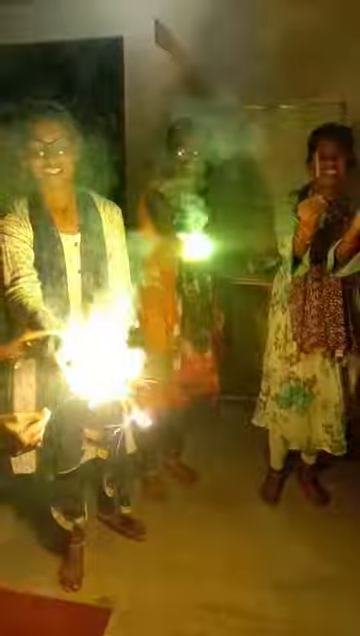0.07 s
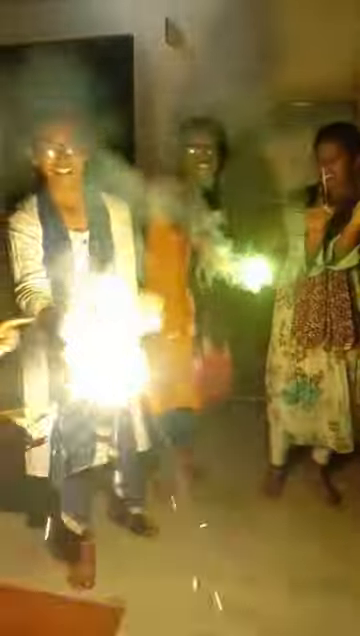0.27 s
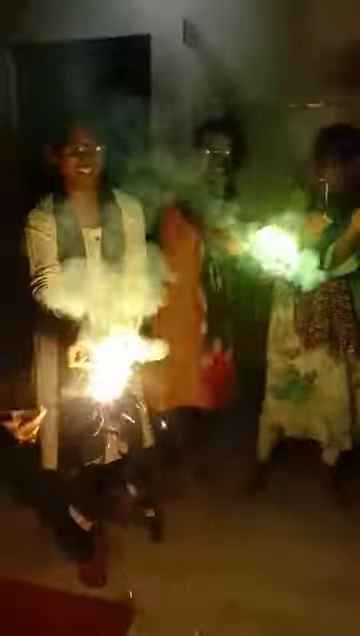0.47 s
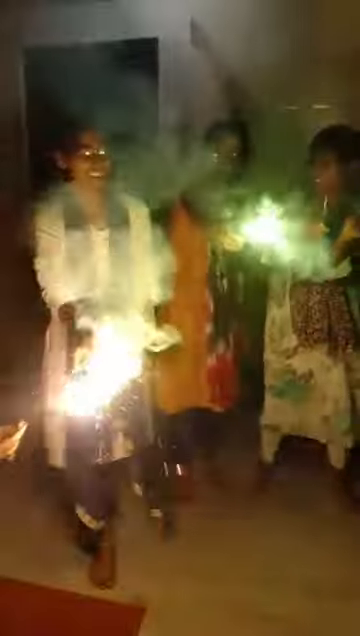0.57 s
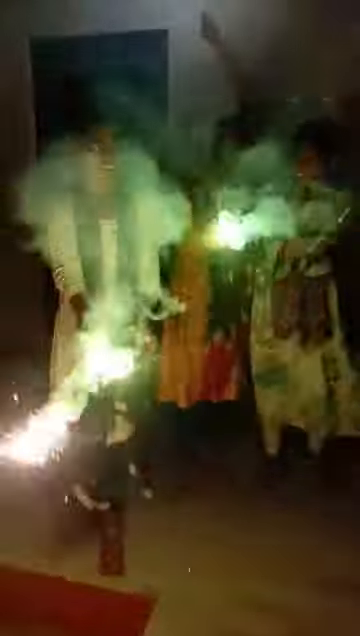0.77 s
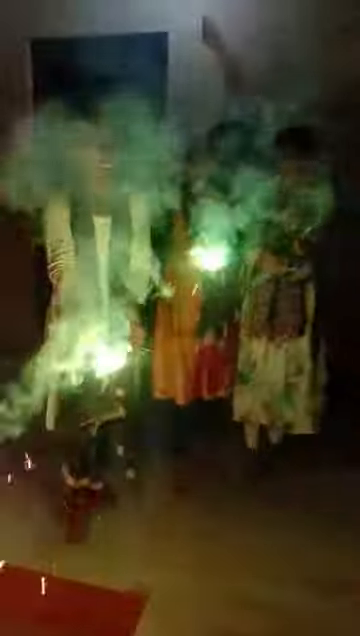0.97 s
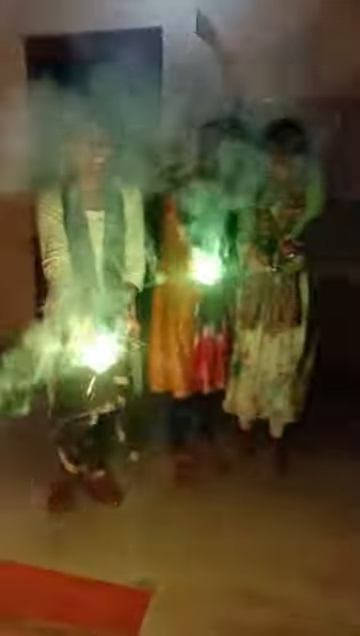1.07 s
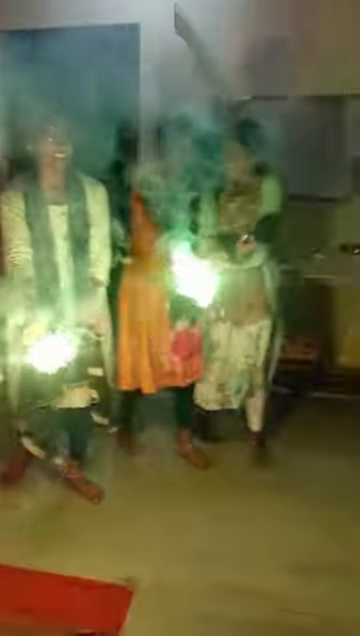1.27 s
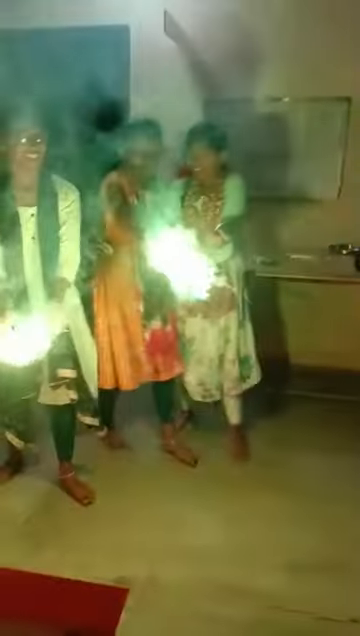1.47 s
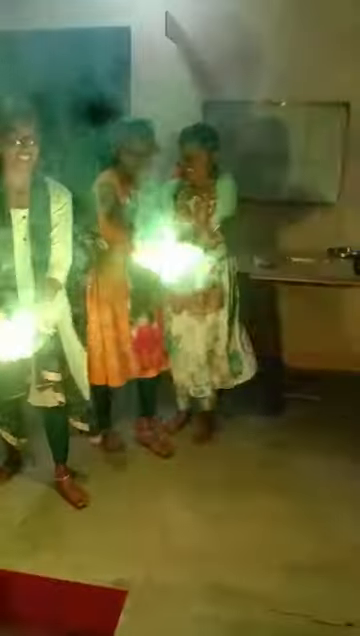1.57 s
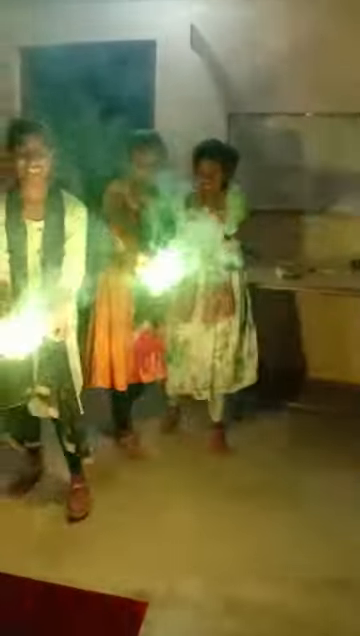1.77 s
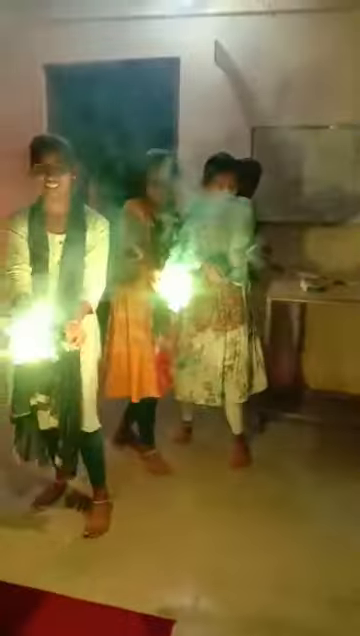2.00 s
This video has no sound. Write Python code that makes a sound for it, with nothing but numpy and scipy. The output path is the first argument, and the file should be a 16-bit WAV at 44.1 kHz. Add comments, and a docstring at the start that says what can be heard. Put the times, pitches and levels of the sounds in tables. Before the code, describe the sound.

Handheld sparklers fizz and crackle close up in a bare, hard room. After silence until 0.12 seconds, hiss fades in with small spits and a faint pip near 0.24. Sharp, echoing pops crowd together from 0.4 to 1.1, strongest near 1.1, then thin out. At 1.53 a firecracker bangs, thumps and decays into low roar, with sparse snaps, treble sizzle and bass swells until about 2.04.

```python
"""Handheld sparklers fizz and spit in a bare, hard room, close to a small microphone; the sound fades in.
The fizz is patchy noise full of small random sparks; loud pops are filtered pulses with their own echoes.
Distinct echoes come back from floor and walls within 25 ms, over a diffuse tail.
A firecracker bangs as a shock, noise blast and thump, then rolls on as a low roar; a faint pip sounds early.
Treble sizzle and late bass swells lie underneath; a look-ahead limiter and a hard ceiling hold the peaks."""
import sys
import numpy as np
from scipy import signal
from scipy.io import wavfile
from scipy.ndimage import uniform_filter1d, minimum_filter1d

SR = 44100
rng = np.random.default_rng(int(sys.argv[2]) if len(sys.argv) > 2 else 0)


def pcm_store(signal):
    """Save signal as 16-bit PCM."""
    levels = np.round(np.clip(np.atleast_2d(signal), -1, 1) * 32767)
    wavfile.write(sys.argv[1], SR, levels.astype(np.int16).T)


N = 89875  # samples


def amp(db):
    """Gain from dB."""
    return 10 ** (np.asarray(db) / 20)


def evened(x):
    """Scales to rms 1."""
    return x / np.sqrt(np.mean(x ** 2) + 1e-20)


def curve(points):
    """A time table read at every sample, in straight lines between its points."""
    return np.interp(np.arange(N) / SR, *np.transpose(points))


def read(points, hz):
    """A spectrum table read on a log-frequency axis."""
    f, value = np.transpose(points)
    return np.interp(np.log(hz + 1), np.log(f + 1), value)


def add(mix, s, sound):
    """Mixes a sound in at a time in seconds, cut off where the mix ends."""
    part = mix[round(s * SR):][:len(sound)]
    part += sound[:len(part)]


# Microphone colour, applied to every noise and click. Each row: frequency in Hz, gain in dB.
MIC_COLOUR = [(30, -24), (70, -4), (130, -4.5), (1000, -7.5), (2500, -4.5), (3500, -1), (4500, 1.5),
              (5800, -0.5), (6400, -9), (6900, -12.5), (7500, -13.5), (8400, -21), (11800, -15.5),
              (13600, -23), (14400, -24), (15200, -27.5), (15700, -50.5)]


def noise(tone, patchy_db, flicker_db):
    """Coloured noise, rms 1, with drifting patches in time and frequency and wide-band flicker."""
    frames, hz = N // 128 + 5, np.fft.rfftfreq(512, 1 / SR)
    real, imag, patches = rng.standard_normal((frames, 257, 3)).T
    patches = uniform_filter1d(patches, size=8, axis=0)  # across neighbouring frequencies
    patches = evened(uniform_filter1d(patches, size=14, axis=1))  # across time frames
    flicker = evened(uniform_filter1d(rng.standard_normal(frames), size=3))
    colour_db = (read(tone, hz) + read(MIC_COLOUR, hz))[:, None]
    gain = amp(colour_db + patchy_db * patches + flicker_db * flicker)
    spectrum = (real + 1j * imag) * gain
    return evened(signal.istft(spectrum, nperseg=512, noverlap=384)[1][:N])


def click(tone, tilt_db=0.):
    """The causal (minimum-phase) pulse of a spectrum through the microphone, peak 1."""
    hz = abs(np.fft.fftfreq(4096, 1 / SR))
    tilt = tilt_db * np.log2((hz + 200) / 4000)  # dB per octave, pivoting near 4 kHz
    log_gain = np.log(amp(read(tone, hz) + read(MIC_COLOUR, hz) + tilt))
    pulse = np.fft.ifft(np.exp(np.conj(signal.hilbert(log_gain)))).real[:1024]
    return pulse / abs(pulse).max()


def sparks(per_s, spread_db):
    """Single-sample impulses at random times with random sign, a few of them large."""
    size = amp(spread_db * np.minimum(rng.exponential(1, N), 4))
    struck = rng.random(N) < per_s / SR
    return size * struck * rng.choice([-1, 1], N)


# Hiss of the burning coat. Each row: time in seconds, level in dB.
FIZZ_LEVEL = [(.12, -55), (.135, -41), (.18, -38.5), (.26, -30.5), (.35, -23), (.48, -27.5), (.62, -26.5),
              (.76, -22), (.9, -23.5), (1.04, -22), (1.2, -23), (1.35, -21), (1.5, -22), (1.62, -23),
              (1.72, -27.5), (1.85, -28), (1.97, -24), (2.04, -42)]
# Colour of the hiss. Each row: frequency in Hz, level in dB per Hz.
FIZZ_TONE = [(50, -21), (200, -12), (500, -7.5), (1200, 0.5), (2500, -1.5), (5000, 2), (9000, -8.5),
             (16000, -16.5)]
# Rate of the small sparks. Each row: time in seconds, sparks a second of each brightness.
SPIT_RATE = [(.15, 70), (.6, 71), (1.15, 35), (1.3, 20), (2.0, 12)]
# Colour of a small spark before its tilt. Each row: frequency in Hz, level in dB per Hz.
SPIT_TONE = [(50, -36), (200, -9), (600, -15.5), (1500, 6), (4000, -7), (9000, 18), (16000, -26)]
# Brightness of the small sparks. Each entry: spectral tilt in dB per octave.
SPIT_TILTS = (1.1, 4.5, 5.6)
SPIT_DB, SPIT_SPREAD_DB, SPIT_ECHO_DB = -13, 3, -3  # the first is relative to the hiss


def fizz():
    """The burning coat: patchy hiss with many small sparks of three brightnesses bursting in it."""
    spits = np.zeros(N)
    for tilt in SPIT_TILTS:
        hits = sparks(curve(SPIT_RATE), SPIT_SPREAD_DB)
        spits += signal.oaconvolve(hits, click(SPIT_TONE, tilt))[:N]
    echoes = signal.oaconvolve(spits, room(1))[:N]
    spits = spits + amp(SPIT_ECHO_DB) * echoes
    hiss = noise(FIZZ_TONE, patchy_db=1.2, flicker_db=.8)
    return amp(curve(FIZZ_LEVEL)) * (hiss + amp(SPIT_DB) * spits)


# Loud sparks. Each row: start in seconds (POP_LAG_S is added), snap level in dB, gain on the echoes in dB,
# levels of thump, body and treble in dB (each raised by its crest), stretch of the echo delays as a ratio.
POPS = [(0.174, -17.5, -1, -68, -35.5, -53, 0.98), (0.1974, -11, -17, -67, -40, -32, 0.96),
        (0.2226, -15, -16, -56, -46, -41, 0.99), (0.2733, -5, -0.5, -32, -18, -30.5, 0.98),
        (0.3186, -11, -6.5, -59, -27, -42, 1), (0.3542, -10, -6, -53, -29, -42, 0.99),
        (0.3856, -2, -16, -45, -33, -35, 0.99), (0.408, 1.5, -16, -43, -37, -31, 0.99),
        (0.4213, -1.5, -11, -38, -26, -27, 1), (0.4359, -0.5, -4, -40, -18.5, -32, 0.98),
        (0.4693, -7, -7, -50, -39, -32, 0.99), (0.4813, -3.5, -14, -48, -35, -37, 0.94),
        (0.4953, -5, -6, -37.5, -24, -40, 0.97), (0.5124, 0.5, -4, -51, -18, -27, 0.98),
        (0.5345, -5, -1.5, -45, -28, -23, 1), (0.5574, -6, -8, -50, -31, -29, 0.97),
        (0.585, -6, -5.5, -51, -29.5, -30, 0.99), (0.6009, -9.5, -5, -57, -34, -31, 0.99),
        (0.6255, -4.5, -8, -51, -43, -39, 0.99), (0.635, -3, -7.5, -44, -24, -27, 0.98),
        (0.6607, 1, -3, -42, -15, -25, 1), (0.6617, -2, -4.5, -31, -26, -25, 0.98),
        (0.7062, -1, -19, -40, -34, -38, 0.88), (0.728, 2.5, -5.5, -38, -16.5, -36, 1),
        (0.7725, -5, -12, -43, -25, -32, 0.99), (0.7903, -1, 1, -28, -17.5, -28, 1),
        (0.834, 3, -4, -56, -15, -39, 0.98), (0.8635, 0, -12, -46, -43, -40, 0.99),
        (0.914, -1, -1.5, -42, -20.5, -31, 0.98), (0.9446, 1, -6, -37, -20.5, -33, 0.95),
        (0.9839, 1, -1.5, -35, -18.5, -39, 1), (1.0303, -5, -13, -58, -35, -40, 0.99),
        (1.0568, -13, -10, -49, -32, -42, 0.99), (1.075, 10, -12.5, -64, -12, -34, 0.99),
        (1.1201, 10.5, -17, -53, -22, -35, 0.96), (1.1348, -4, -2.5, -39, -23, -30, 1),
        (1.1541, -2.5, -7, -51, -27, -31, 0.91), (1.1654, -14, -11, -57, -40, -28, 0.99),
        (1.255, 0.5, -3, -37, -14.5, -36, 0.98), (1.3367, -22, -8, -52, -22, -28, 1),
        (1.384, -10, -10, -59, -39, -31, 0.99), (1.4166, -25.5, 1, -60, -27.5, -43, 0.96),
        (1.488, -29, -17, -44, -29.5, -24, 0.99), (1.5124, -22, -13, -48, -33, -33, 0.99),
        (1.5192, -4, -21, -43, -21, -22, 0.99), (1.6087, -2, -6, -36, -8, -41, 0.99),
        (1.6768, -11, -16, -37, -20.5, -27, 0.96), (1.6823, -5, -24, -36, -26, -34, 0.99),
        (1.9101, -15, -8, -37, -28.5, -36, 0.99), (1.9912, -13, -5, -38, -31, -34, 0.95),
        (2.0213, -11, -3, -35, -29.5, -27, 1)]
# Colour of the snap. Each row: frequency in Hz, level in dB per Hz.
SNAP_TONE = [(500, -25.5), (2000, 0), (3000, -1), (6500, 0.5), (9000, -5), (16000, -50)]
# Colour of the body. Each row: frequency in Hz, level in dB per Hz.
BODY_TONE = [(80, -22.5), (250, -1.5), (1000, 0.5), (2200, 6.5), (4000, -33), (9000, -59.5)]
# Colour of the treble, in the pops and in the sizzle. Each row: frequency in Hz, level in dB per Hz.
SIZZLE_TONE = [(5000, -35), (8000, -10), (10000, -9), (13000, -13), (16000, 17.5)]
# What the walls take from the pops. Entries: gain in dB for snap, thump, body and treble.
ECHO_LOSS_DB = (0, -12, -5, -1)
POP_LAG_S = 0.00045
THUMP_HZ, THUMP_T60 = 125, .028  # T60: seconds to fall 60 dB
THUMP_CREST_DB, BODY_CREST_DB, TREBLE_CREST_DB = 12, 10.5, 11  # peak of each part over its table level


def pops():
    """Loud sparks: a snap pulse with body, treble and a decaying low thump, then its echoes."""
    out, t = np.zeros(N), np.arange(1024) / SR
    thump = amp(-60 * t / THUMP_T60) * np.sin(2 * np.pi * THUMP_HZ * t)
    parts = np.array([click(SNAP_TONE), thump, click(BODY_TONE), click(SIZZLE_TONE)])
    for s, snap_db, echo_db, thump_db, body_db, treble_db, stretch in POPS:
        levels = amp([snap_db, thump_db + THUMP_CREST_DB,
                      body_db + BODY_CREST_DB, treble_db + TREBLE_CREST_DB])
        direct = levels @ parts
        sent_to_walls = (levels * amp(ECHO_LOSS_DB)) @ parts
        echoes = signal.fftconvolve(room(stretch), sent_to_walls)
        add(out, s + POP_LAG_S, direct)
        add(out, s + POP_LAG_S, amp(echo_db) * echoes)
    return out


# Returns from floor and walls. Each row: delay in seconds before stretch and scatter, level in dB.
ECHOES = [(.0008, -6.5), (.0014, -2.5), (.007, -7), (.0088, -8), (.011, -12), (0.014, -0.5), (.0157, 0),
          (0.017, -2), (.0198, -6.5), (.022, -13)]
ECHO_SCATTER_S, SMEAR_S, SMEAR_DB = .0003, 0.00095, -13.5  # SMEAR_S is a decay time constant
TAIL_DB, TAIL_T60, TAIL_RISE_S = -22, 0.17, 0.0064  # T60 in seconds


def room(stretch):
    """Echoes for one spot in the room: scattered wall returns, each smeared, over a diffuse tail."""
    t = np.arange(SR // 4) / SR
    rise = 1 - np.exp(-(t / TAIL_RISE_S) ** 2)
    taps = amp(TAIL_DB - 60 * t / TAIL_T60) * rise * rng.standard_normal(len(t))
    smear_t = t[:300]
    for delay, db in ECHOES:
        smear = amp(SMEAR_DB) * np.exp(-smear_t / SMEAR_S) * rng.standard_normal(300)
        impulse = smear_t == 0
        shift = np.minimum(ECHO_SCATTER_S, delay / 2) * rng.uniform(-0.92, 1)
        add(taps, delay * stretch + shift, amp(db) * (smear + impulse))
    return taps


# Colour of the shock and blast. Each row: frequency in Hz, level in dB per Hz.
BANG_TONE = [(50, -3), (150, 3.5), (500, 7.5), (1200, 8), (2500, -1), (5000, -0.5), (9000, -5.5),
             (16000, -4)]
# Roar after the bang. Each row: time in seconds, level in dB, level of its ringing band in dB.
ROAR_LEVELS = [(1.54, -34, -6), (1.562, -20, 1.5), (1.594, -24, -21), (1.664, -24.5, -21),
               (1.704, -26.5, -31.5), (1.746, -22.5, -18.5), (1.818, -23, -30), (1.86, -25.5, -23),
               (1.9, -19.5, -36), (1.918, -29, -44), (1.932, -22.5, -34), (1.956, -27, -33),
               (2.006, -26, -34), (2.038, -39, -34)]
# Colour of the roar. Each row: frequency in Hz, level in dB per Hz.
ROAR_TONE = [(50, -14), (130, -8), (300, -1.5), (700, -0.5), (1200, -2.5), (2000, -7.5), (3000, -13),
             (5000, -17.5), (9000, -42)]
# Colour of the ringing band. Each row: frequency in Hz, level in dB per Hz.
ROAR_RING_TONE = [(600, -23.5), (1050, -5.5), (1200, -2), (1330, -5.5), (1500, -9), (2500, -25.5)]
BANG_S, BANG_RISE_S, BANG_HOLD_S = 1.5308, 0.00026, .022  # start, rise and hold in seconds
BANG_DB, BANG_T60, SHOCK_DB = 10.5, 0.14, 14  # T60 in seconds
BANG_THUMP_HZ, BANG_THUMP_T60, BANG_THUMP_DB = 142, 0.11, -9.5


def firecracker():
    """A shock pulse, a noise blast that holds and dies fast, a sine thump, then a low uneven roar."""
    t = np.maximum(np.arange(N) / SR - BANG_S, 0)  # seconds since the bang
    blast_db = BANG_DB - 60 * np.maximum(t - BANG_HOLD_S, 0) / BANG_T60
    blast = amp(blast_db) * noise(BANG_TONE, patchy_db=0.65, flicker_db=1.57)
    s, level_db, ring_db = np.transpose(ROAR_LEVELS)
    roar = amp(curve(np.c_[s, level_db])) * noise(ROAR_TONE, patchy_db=0.5, flicker_db=0.5)
    ringing = amp(curve(np.c_[s, ring_db])) * noise(ROAR_RING_TONE, patchy_db=0.74, flicker_db=2.3)
    out = np.minimum(t / BANG_RISE_S, 1) * (blast + roar + ringing)
    thump_gain = amp(BANG_THUMP_DB - 60 * t / BANG_THUMP_T60)
    out = out + thump_gain * np.sin(2 * np.pi * BANG_THUMP_HZ * t)
    add(out, BANG_S, amp(SHOCK_DB) * click(BANG_TONE))
    return out


PIP_START_S, PIP_LENGTH_S, PIP_HZ, PIP_DB = .241, .029, 650, -37


def pip():
    """A brief faint tone: a sine and two overtones under a rounded envelope."""
    t, out = np.arange(0, PIP_LENGTH_S, 1 / SR), np.zeros(N)
    tone = np.zeros(len(t))
    for harmonic, db in ((1, 0), (2, -12), (3, -6)):
        tone += amp(db) * np.sin(2 * np.pi * PIP_HZ * harmonic * t)
    envelope = np.sin(np.pi * t / PIP_LENGTH_S) ** .5
    add(out, PIP_START_S, amp(PIP_DB) * envelope * tone)
    return out


# Treble sizzle. Each row: time in seconds, level in dB.
SIZZLE_LEVEL = [(0.13, -56), (0.192, -50), (0.448, -36.5), (0.856, -38.5), (0.888, -52), (0.936, -34),
                (1.048, -41), (1.488, -37), (1.504, -58), (1.542, -37), (1.604, -45), (1.86, -51),
                (1.912, -33), (2.038, -38.5)]
# Bass under the roar. Each row: time in seconds, level in dB.
RUMBLE_LEVEL = [(1.44, -47), (1.504, -31), (1.546, -46), (1.59, -54), (1.84, -37.5), (1.91, -28.5),
                (1.982, -34.5), (2.012, -19), (2.038, -40)]
# Colour of the bass. Each row: frequency in Hz, level in dB per Hz.
RUMBLE_TONE = [(50, -29), (130, 9.5), (250, 1), (500, -12), (1000, -28)]
TICKS_PER_S, TICK_DB, TICK_SPREAD_DB = 250, 10.5, 4  # tiny bright sparks in the treble


def treble_and_bass():
    """Top-end noise ticking with tiny sparks throughout, and late swells of bass noise."""
    ticks = signal.oaconvolve(sparks(TICKS_PER_S, TICK_SPREAD_DB), click(SIZZLE_TONE))[:N]
    sizzle = evened(noise(SIZZLE_TONE, patchy_db=1.7, flicker_db=2.7) + amp(TICK_DB) * ticks)
    treble = amp(curve(SIZZLE_LEVEL)) * sizzle
    fade_in = np.clip((np.arange(N) / SR - RUMBLE_LEVEL[0][0]) / .03, 0, 1)  # over 30 ms
    bass = fade_in * amp(curve(RUMBLE_LEVEL)) * noise(RUMBLE_TONE, patchy_db=5.7, flicker_db=0.68)
    return treble + bass


START_S = 0.1234


def scene():
    """All sources summed, silent until the sound opens."""
    mix = fizz() + pops() + firecracker() + pip() + treble_and_bass()
    is_open = np.arange(N) / SR > START_S
    return (mix * is_open)[None]


RING_HZ, RING_WIDTH_HZ, RING_DB = 1251, 65, 4  # narrow resonance at the microphone
LIMIT_DB, LOOKAHEAD_S, RECOVER_DB_PER_S = 3.5, 0.019, 223
CEILING = 0.89  # clipping amplitude, ahead of the filters
LOW_CUT_HZ, EDGE_HZ = 78, 15540


def record(dry):
    """Microphone resonance, look-ahead limiter, hard clipping ceiling, then low cut and treble edge."""
    ring = signal.lfilter(*signal.iirpeak(RING_HZ, RING_HZ / RING_WIDTH_HZ, SR), dry)
    x = dry + amp(RING_DB) * ring
    over_db = np.maximum(20 * np.log10(abs(x[0]) + 1e-9) - LIMIT_DB, 0)
    ahead = round(LOOKAHEAD_S * SR)
    # the largest overshoot coming up within the look-ahead
    held = -minimum_filter1d(-over_db, size=ahead, origin=-(ahead // 2) + 1)
    # gain reduction recovers at a steady rate in dB
    fall = np.arange(N) * RECOVER_DB_PER_S / SR
    held = np.maximum.accumulate(held + fall) - fall
    reduction_db = uniform_filter1d(held, size=ahead, origin=(ahead - 1) // 2)
    x = np.clip(x / amp(reduction_db), -CEILING, CEILING)
    x = signal.sosfilt(signal.butter(2, LOW_CUT_HZ, "high", fs=SR, output="sos"), x)
    low_pass = signal.firwin(401, EDGE_HZ, window=("kaiser", 9), fs=SR)
    return signal.oaconvolve(x, low_pass[None], "same")


dry = scene()
out = record(dry)
pcm_store(out)
```